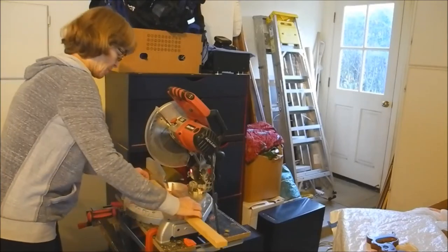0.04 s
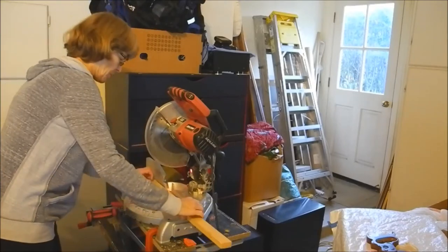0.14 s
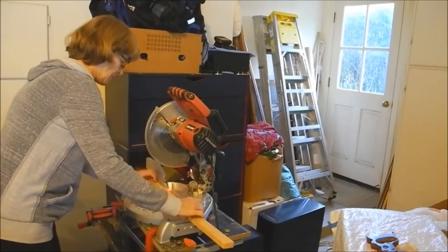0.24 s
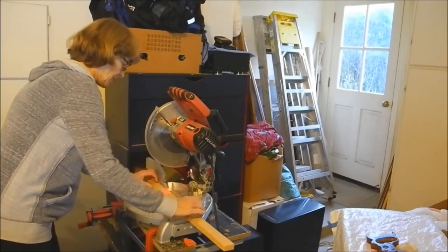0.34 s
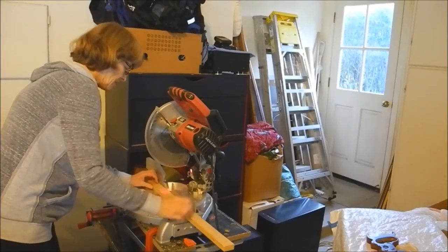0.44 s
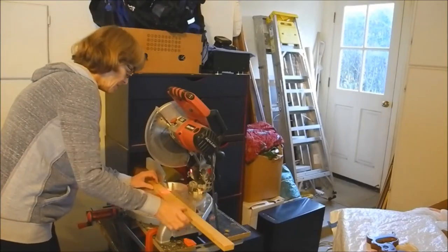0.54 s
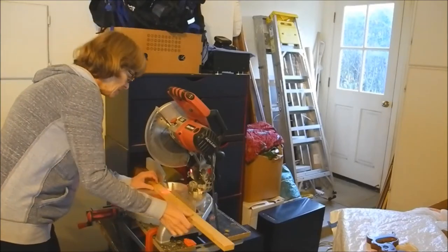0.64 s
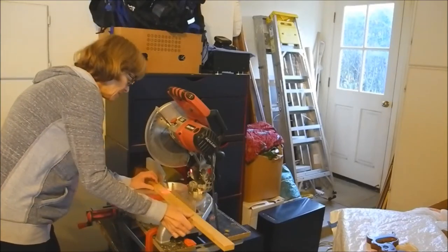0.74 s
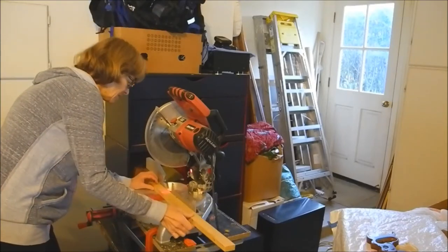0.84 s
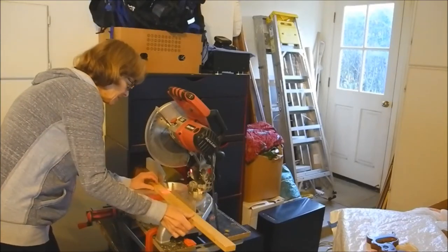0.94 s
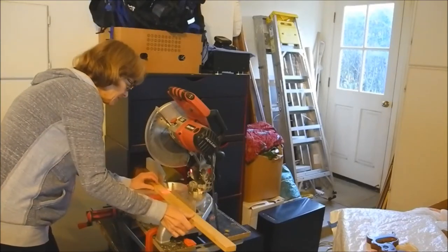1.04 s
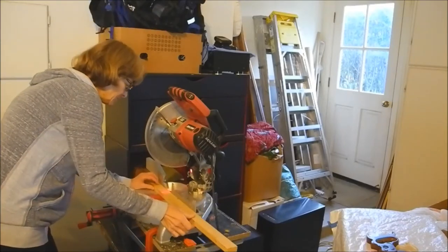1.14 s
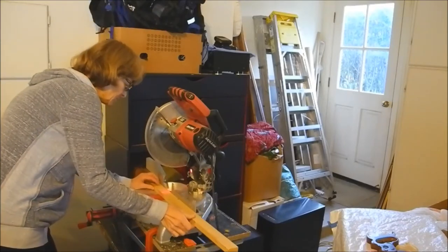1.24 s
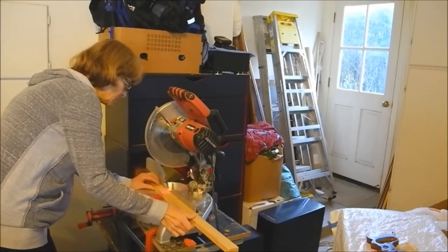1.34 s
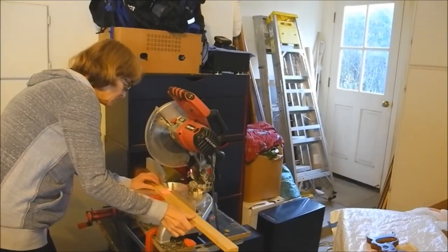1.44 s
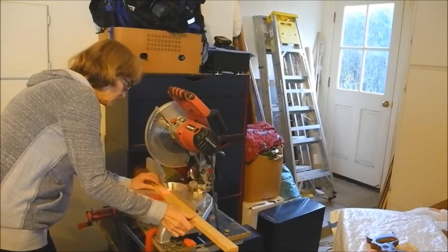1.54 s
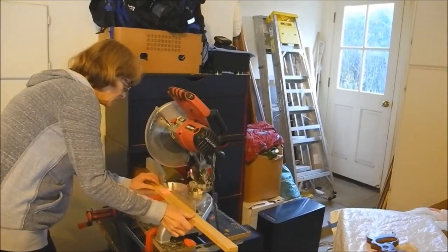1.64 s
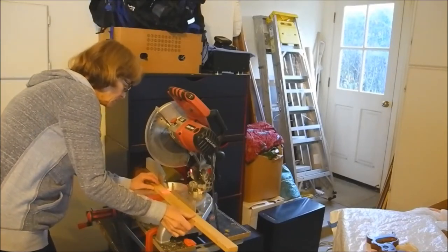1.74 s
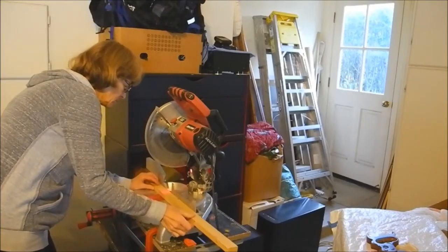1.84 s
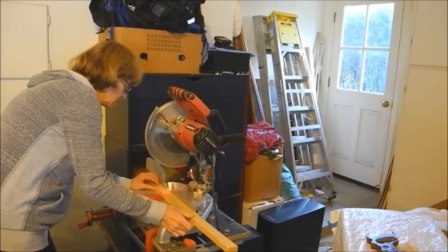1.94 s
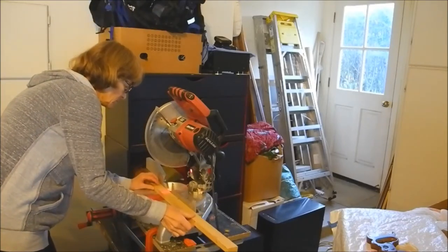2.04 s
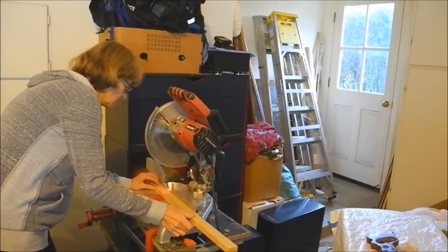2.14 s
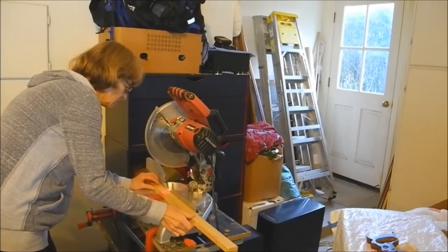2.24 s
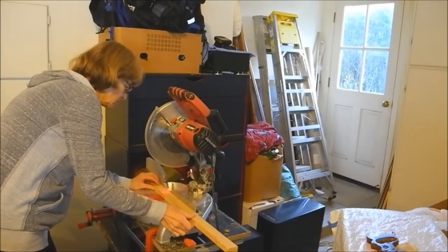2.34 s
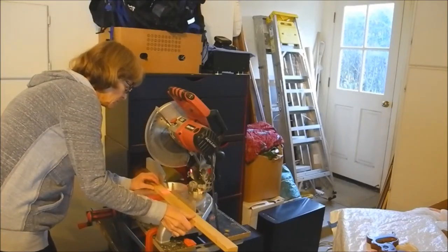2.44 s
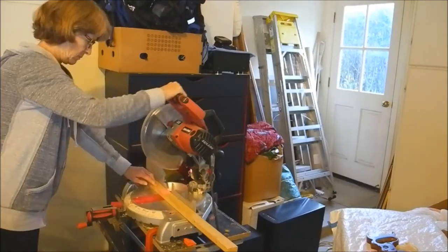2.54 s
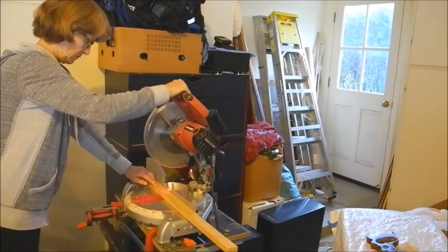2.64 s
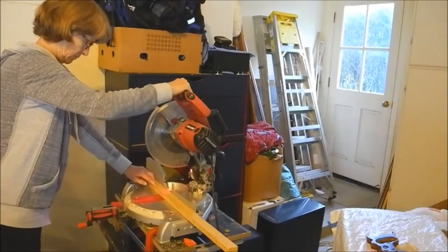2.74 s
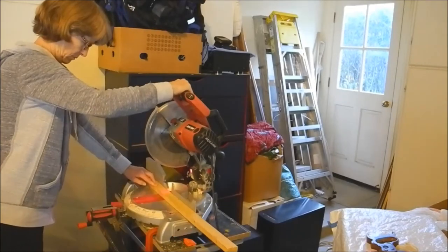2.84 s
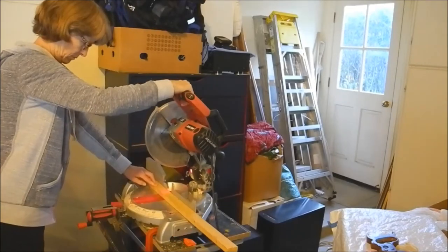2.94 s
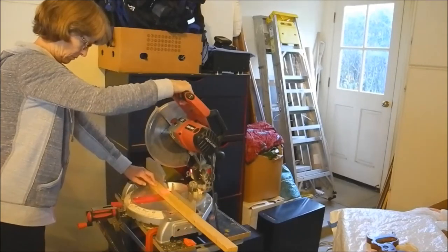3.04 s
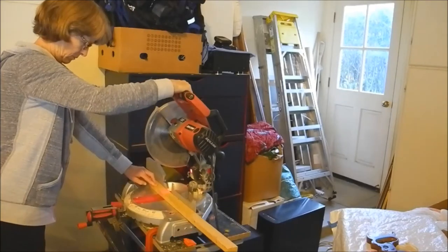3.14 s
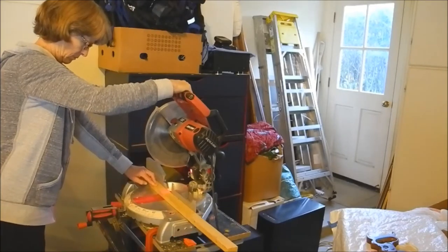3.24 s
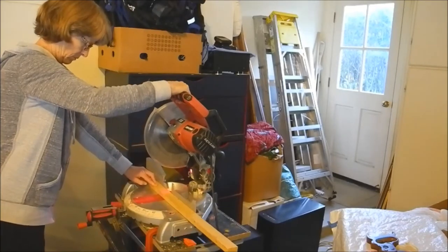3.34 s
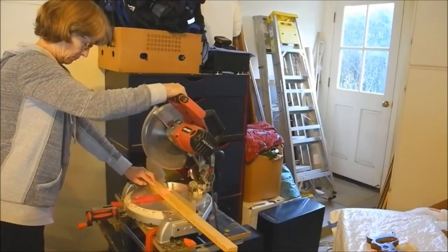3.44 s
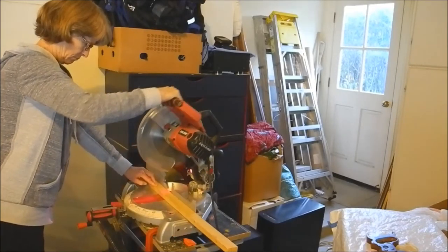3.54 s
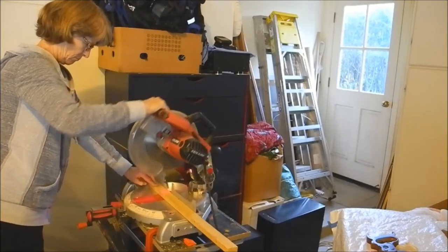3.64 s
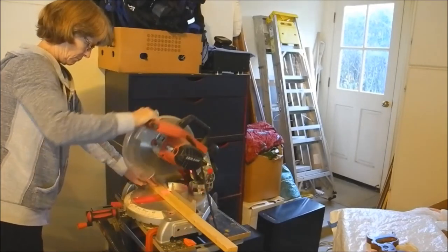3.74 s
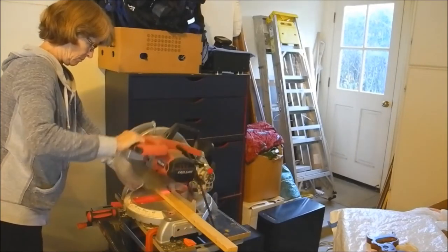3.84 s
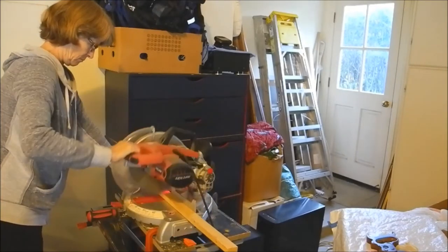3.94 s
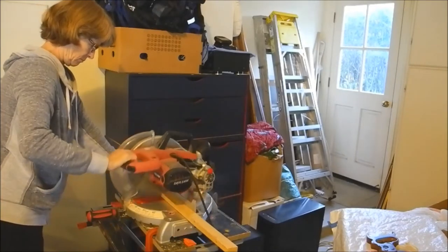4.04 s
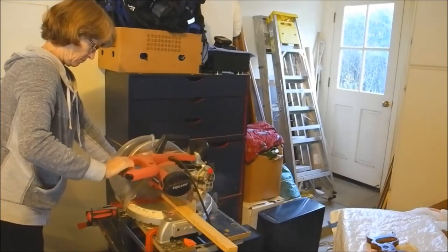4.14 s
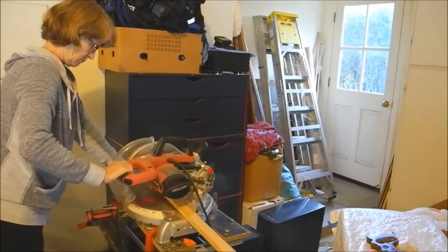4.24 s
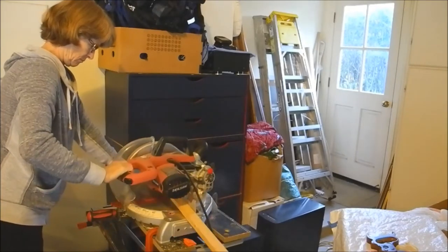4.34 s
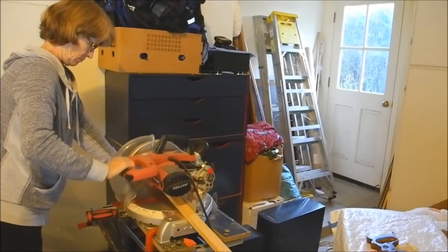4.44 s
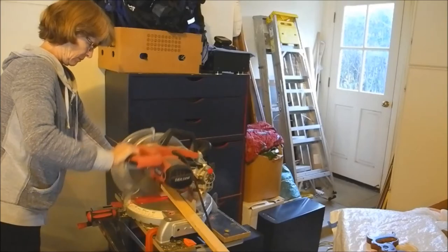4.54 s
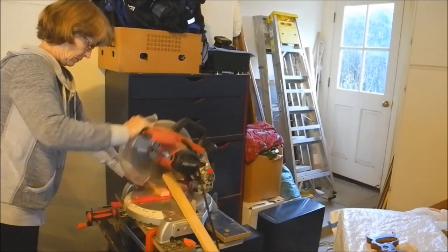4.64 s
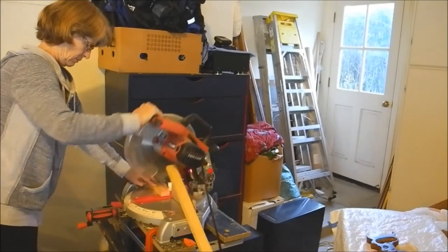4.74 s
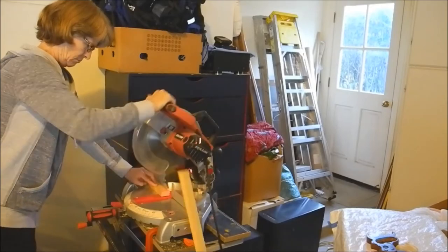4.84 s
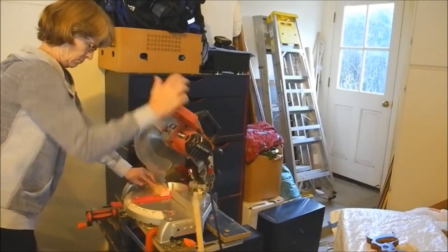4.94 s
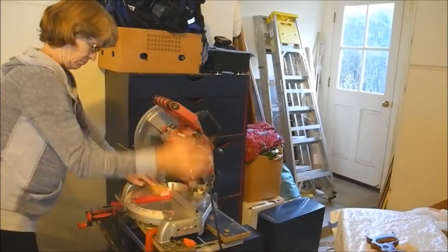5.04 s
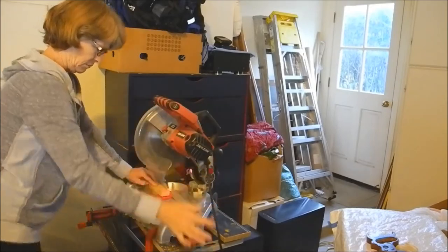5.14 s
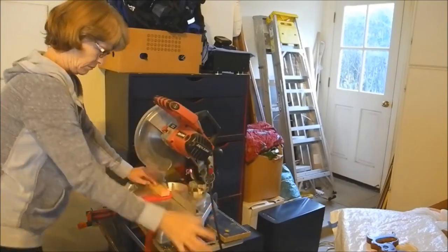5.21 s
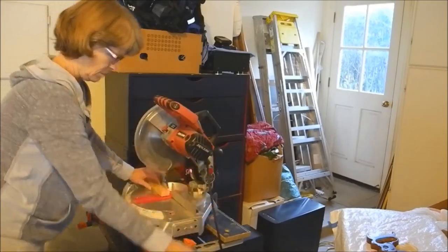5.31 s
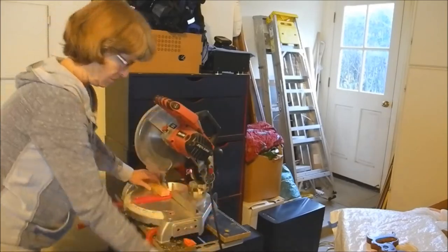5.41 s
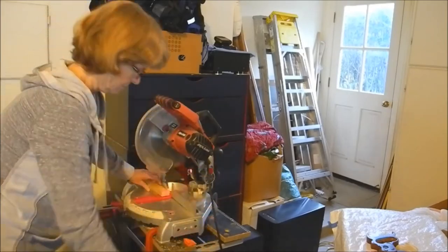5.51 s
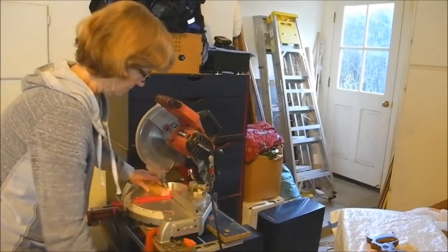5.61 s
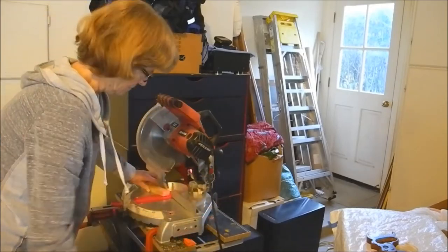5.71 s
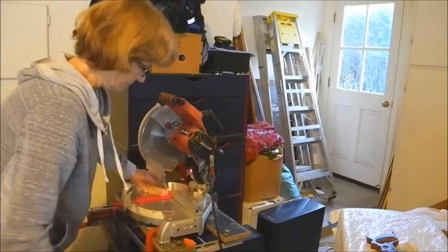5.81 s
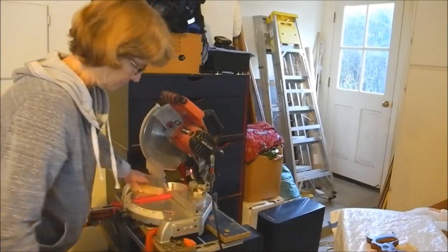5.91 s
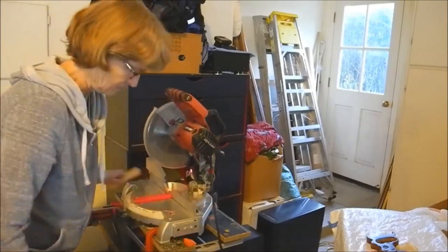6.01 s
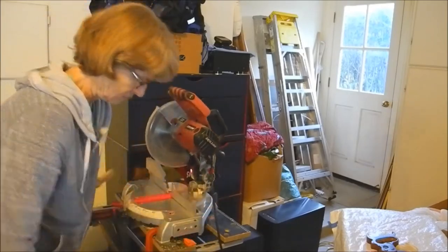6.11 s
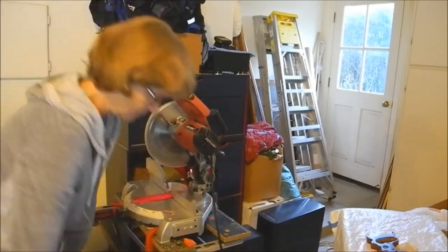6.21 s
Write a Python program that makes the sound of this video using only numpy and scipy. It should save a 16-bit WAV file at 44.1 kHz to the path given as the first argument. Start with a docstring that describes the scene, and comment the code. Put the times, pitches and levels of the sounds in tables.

```python
"""In a garage, a wood strip is knocked and slid into place on a miter saw and a hand claps onto the handle.
The motor kicks in, winds up, sags in the cut, then brakes and coasts with falling whines. The sawn-off
length bounces on the floor; the short piece knocks on the saw's table. The saw is noise and tones tied to
its shaft speed; knocks are noise bursts with ringing modes; slides and the room are coloured noise."""
import sys
import numpy as np
from scipy import signal
from scipy.fft import rfft, irfft, next_fast_len
from scipy.io import wavfile
from scipy.ndimage import map_coordinates

SR = 44100
rng = np.random.default_rng(int(sys.argv[2]) if len(sys.argv) > 2 else 0)


def to_wav(sig):
    """Store sig (one row per channel, or 1-D mono) as 16-bit WAV at the path in sys.argv[1].

    Samples outside -1..1 are clipped; the rate is SR.
    """
    pcm = np.clip(np.atleast_2d(sig), -1, 1) * 32767
    pcm = np.round(pcm).astype(np.int16)
    wavfile.write(sys.argv[1], SR, pcm.T)  # frames by channels


N = 276507
T = np.arange(N) / SR  # seconds

# Whistles of the blade teeth. Each row: multiple of the tooth rate, relative level in dB.
TOOTH_WHISTLES = [(2, 1), (3, -13), (4, 0), (5, -12), (6, -1.5), (8, -5), (10, -8), (12, -6)]
# How well the blade radiates. Each row: frequency in Hz, gain in dB driven, gain in dB coasting.
BLADE_RADIATION = [(300, -30, -30), (1000, -14, -11), (1700, -5, -3), (2700, 1, 2), (3500, -2, 0),
                   (4500, -5, -7), (5300, -6, -13), (6000, 1, -12), (7000, 1.5, -8), (9000, -8, -22),
                   (10500, -9, -25), (13000, -1, -30), (15500, -4, -40)]
# The blade singing in the kerf. Each row: frequency in Hz, relative level in dB.
KERF_SONG = [(2423, 12), (6290, 1), (12900, -10)]
# Colour of the driven saw. Each row: frequency in Hz, relative density in dB per Hz.
RUNNING_COLOUR = [(88, -55), (150, -41.5), (290, -13.5), (333, -9), (381, -9.5), (491, 3), (530, -2.5),
                  (683, 1.5), (932, 0), (1770, -2), (2710, 5), (8880, -18), (11700, -17.5), (13100, -19),
                  (15600, -21.5)]
# Swish of the free blade. Each row: frequency in Hz, relative density in dB per Hz.
COASTING_COLOUR = [(120, -77), (200, -45), (310, -18), (489, -4.5), (1090, -4), (1690, -3), (1880, -6.5),
                   (2710, -2), (4770, -10), (6620, -8.5), (8550, -21), (10300, -14), (15600, -27.5)]
# Resonances of the motor housing. Each row: frequency in Hz, width in Hz, relative level in dB.
HOUSING_PEAKS = [(487, 26, 4.5), (570, 52, -4), (676, 12, 0), (730.3, 28, 9), (749.4, 34, 4),
                 (900, 23, -19.5), (988, 25, -0.5), (1175, 33, -5), (1294, 79, 2.5), (1683, 53, -1),
                 (2222, 40, -17), (2435, 50, -4.5), (2700, 210, -11), (3390, 61, 2.5)]
# Gear case under starting torque. Each row: frequency in Hz, width in Hz, relative level in dB.
GEAR_CASE_PEAKS = [(244, 23, -9), (478, 23, -1.5), (719, 22, 0), (914, 44, 2.5), (978, 22, 3),
                   (1183, 90, -6), (1474, 15, -2.5)]
# Swells of the roar while the head is lowered and lifted. Each row: time in seconds, level in dB.
ROAR_SWELLS = [(3.55, -24), (3.738, -23.5), (3.94, -21), (4.022, -26.5), (4.244, -24.5), (4.272, -27),
               (4.422, -21), (4.446, -24), (5.0, -23)]

# Wood set on the saw's table.
# Each row: start in seconds, relative level in dB, thud trim in dB, click trim in dB.
PLACING_BLOWS = [(0.002, -15, -17, -10), (0.046, -18, -24, -15), (0.093, -20, -52, -19),
                 (0.303, -13.5, -13, -21), (0.309, -11.5, -14.5, -23), (0.335, -23, -18, -42),
                 (0.526, -32.5, -11, -44), (0.641, -33, -35, -14)]
# Blows on the saw's handle and switch.
# Each row: start in seconds, relative level in dB, thud trim in dB, click trim in dB.
HANDLE_BLOWS = [(2.6395, -8, -18, -13.5), (2.979, -42.5, -29, -3), (3.005, -35, -28, -12.5),
                (3.136, -18, -30, -0.5)]
# The sawn-off length on the floor.
# Each row: start in seconds, relative level in dB, thud trim in dB, click trim in dB.
FLOOR_BLOWS = [(5.162, -22.5, 5, 9), (5.391, -30.5, 3.5, -35), (5.434, -27.5, -12, 5),
               (5.45, -26.5, -6, -33), (5.485, -37, -6, -28), (5.53, -28.5, -12, -21),
               (5.635, -30.5, -23, 11), (5.66, -32, -11, 18), (5.715, -38, -16, -7)]
# The short piece on the table.
# Each row: start in seconds, relative level in dB, thud trim in dB, click trim in dB.
OFFCUT_BLOWS = [(6.073, -14, -4.5, 0)]
# Ring of the saw's table. Each row: frequency in Hz, mean level in dB, t60 in seconds.
TABLE_RING = [(737, -12, 0.25), (1057, 5.5, 0.35), (1236, -11, 0.07), (1430, -18, .3), (2020, -28, .3),
              (2480, -18, 0.35)]
# Ring of the saw's head and guard. Each row: frequency in Hz, mean level in dB, t60 in seconds.
SAW_RING = [(479, 0, .36), (641, -2, .26), (700, -7, .36), (834, -14, .4), (1190, -2, .25), (1260, -11, .3),
            (2250, -24, .25), (2401, -21, .25), (2988, -27, .6), (3321, -19, .24), (7138, -40, .45)]
# Ring of the wood strip. Each row: frequency in Hz, mean level in dB, t60 in seconds.
STRIP_RING = [(500, -12, 0.2), (650, -5.5, 0.31), (925, 1, 0.3), (1330, -28, 0.18), (1672, 4, 0.14),
              (1750, -6, 0.13), (2510, -15, 0.13), (2850, -15, 0.11)]
# Rattle of knocked wood. Each row: frequency in Hz, relative density in dB per Hz.
WOOD_RATTLE = [(59, -65), (100, -32), (383, -4.5), (425, -14.5), (558, -6.5), (674, -2.5), (718, -12),
               (780, -14), (1320, -9), (2130, -18), (5720, -55), (15000, -75)]
# Rattle of the knocked saw. Each row: frequency in Hz, relative density in dB per Hz.
SAW_RATTLE = [(59, -66), (100, -38), (246, -17), (345, -38.5), (492, 4.5), (570, -24), (718, -5),
              (1090, -7.5), (1210, -1.5), (1490, -16), (3050, -19), (7350, -36), (9260, -40.5),
              (13000, -39), (15000, -47)]
# Hollower rattle of the short piece. Each row: frequency in Hz, relative density in dB per Hz.
HOLLOW_RATTLE = [(100, -30), (250, -14.5), (450, -0.5), (700, -3.5), (1000, 1.5), (1300, 3.5), (1700, -15),
                 (4000, -20), (12000, -50)]
# Steel left ringing by a knock, the fence, then the still blade.
# Each row: start in seconds, frequency in Hz, starting level in dB, t60 in seconds.
STEEL_TONES = [(0.003, 2410, -42, .6), (0.003, 3270, -49, .55), (0.093, 1960, -23, .07),
               (0.093, 1945, -34, .35), (2.641, 3820, -56, 4.5)]
# The strip pushed along the fence.
# Each row: centre in seconds, half length in seconds, level in dB, treble tilt in dB.
STRIP_PUSHES = [(0.176, .02, -59, -7), (0.452, 0.017, -51, 10), (0.666, 0.23, -63.5, 15.5),
                (0.873, 0.042, -50, 1), (1.097, 0.044, -50.5, 0.5), (1.278, 0.032, -50.5, 2.5)]
# Rub of the strip. Each row: frequency in Hz, relative density in dB per Hz.
RUB_COLOUR = [(240, -32), (400, -5), (510, -14), (650, 2.5), (867, -17), (979, -3), (1290, -4.5),
              (2220, -12.5), (15000, -43)]

# Murmur of the garage. Each row: frequency in Hz, relative density in dB per Hz.
MURMUR_COLOUR = [(12, -41), (20, -16), (70, -5), (126, -3), (282, -10), (343, -7.5), (453, -14),
                 (521, -8.5), (616, -13), (814, -13), (1050, -18), (2100, -26), (3560, -29.5),
                 (15600, -36.5)]
# Stereo width of noise. Each row: frequency in Hz, left-right likeness from 0 to 1.
LIKENESS = [(30, .05), (100, 0.41), (300, 0.59), (600, 0.81), (1200, 0.52), (2500, 0.35), (5000, 0.3),
            (10000, .05)]
# Stereo lean. Each row: frequency in Hz, left minus right in dB.
STEREO_LEAN = [(100, -2), (500, -0.5), (1000, -1), (3000, -3), (8000, -1.5), (12000, -5.5)]
# Decay of the garage's echo. Each row: frequency in Hz, t60 in seconds.
GARAGE_T60 = [(150, 0.5), (400, 0.49), (1000, .42), (3000, 0.41), (8000, 0.37), (15000, 0.26)]

ON_S, OFF_S, STOP_S = 3.13, 4.879, 5.163  # switch closes; switch opens and brake grips; brake lets go
FREE_HZ = 343.8  # turns per second that the unloaded motor tends to
KICK_SHARE, KICK_S, WIND_UP_S = .229, .1, .485  # first kick's share of that speed; two time constants
CUT_S, SAG_HZ, SAG_S = 3.986, 13.95, .173  # blade meets wood; speed lost; time to the deepest sag
SLOW_S, SLOW_POWER = 3.03, 6.027  # switched off, speed falls as (1 + t / SLOW_S) ** -SLOW_POWER
CUT_LENGTH_S, CUT_ATTACK_S, CUT_RELEASE_S = 0.22, 0.016, 0.054  # in the wood; entering; breaking through
BITE_DB, BITE_DB_PER_S = -37, 31  # cutting gain on entering; its growth as the blade sinks in
SHAKE_HZ, SHAKE_WIDTH_HZ = 203, 28  # shaft speed at which the saw resonates, and how widely
COAST_DB, COAST_DB_PER_S = -42, 2.5  # gain of the free blade and gears, and its slow swell
WHINE_FADE_DB_PER_S, FREE_WHISTLE_DB = 60, -42.7  # whine's fade once switched off; coasting whistle gain
BARS, TEETH_PER_TURN = 40, 8.2  # commutator pulses and blade teeth for each turn of the motor
MURMUR_DB = -57  # murmur heard up to the saw's start
TOP_HZ = 15780  # band limit


def amp(db):
    """Decibels to gain."""
    return 10 ** (np.asarray(db) / 20)


def unit(x):
    """Scale to rms 1."""
    return x / np.sqrt(np.mean(x ** 2) + 1e-20)


def along(points, hz):
    """(Hz, value) points read on a log axis."""
    f, v = np.transpose(points)
    return np.interp(np.log(hz + 1), np.log(f + 1), v)


def wobble(rate):
    """A smooth random curve, rate knots a second."""
    return map_coordinates(rng.standard_normal(int(N * rate / SR) + 4), [T * rate])


def after(s, rise):
    """A gate that opens at s over rise seconds."""
    return np.clip((T - s) / rise, 0, 1)


def bump(s, half):
    """A bell-shaped swell centred on s."""
    return np.exp(-.5 * ((T - s) / half) ** 2)


def filtered(x, response):
    """x times a response of frequency."""
    n = x.shape[-1]
    m = next_fast_len(n + 8192)
    return irfft(rfft(x, m) * response(np.fft.rfftfreq(m, 1 / SR)), m)[..., :n]


def below(hz, edge_hz, order=6):
    """Low side of a crossover."""
    return 1 / (1 + (hz / edge_hz) ** order)


def resonances(peaks, hz):
    """Response of a body with (Hz, width, dB) peaks of alternating sign."""
    def peak(centre, width, db):
        return amp(db) * 1j * hz * width / (centre ** 2 - hz ** 2 + 1j * hz * width)
    return sum((-1) ** k * peak(*row) for k, row in enumerate(peaks))


def diffuse(response, size=N):
    """Coloured stereo noise of rms 1, its channels most alike in the midrange."""
    def mid_and_side(hz):
        turn = np.arccos(np.clip(along(LIKENESS, hz), -1, 1)) / 2
        return response(hz) * np.array([np.cos(turn), np.sin(turn)])
    mid, side = filtered(rng.standard_normal((2, size)), mid_and_side)
    return unit(np.array([mid + side, mid - side]))


def in_garage(x, wet_db):
    """Direct sound plus a tail whose treble dies first, at about the same power."""
    hz, t, z = signal.stft(diffuse(np.ones_like, size=SR // 2), SR, nperseg=256)
    decay = amp(-60 * t / along(GARAGE_T60, hz)[:, None]) * np.clip(t / 0.0029, 0, 1)
    tail = signal.istft(z * decay, SR, nperseg=256)[1]
    echo = signal.fftconvolve(x[None], tail / np.linalg.norm(tail[0]), axes=1)[:, :len(x)]
    return (x + amp(wet_db) * echo) / np.hypot(1, amp(wet_db))


def shaft_speed():
    """Turns per second: a kick and a wind-up, a sag in the cut, and a long run-down."""
    run = np.clip(T, ON_S, OFF_S) - ON_S
    wind_up = 1 - KICK_SHARE * np.exp(-run / KICK_S) - (1 - KICK_SHARE) * np.exp(-run / WIND_UP_S)
    load = (np.clip(T, CUT_S, OFF_S) - CUT_S) / SAG_S
    driven = FREE_HZ * wind_up - SAG_HZ * load * np.exp(1 - load)
    return driven / (1 + np.maximum(T - OFF_S, 0) / SLOW_S) ** SLOW_POWER


def in_wood():
    """1 while the blade is in the wood, 0 outside."""
    return after(CUT_S, CUT_ATTACK_S) * (1 - after(CUT_S + CUT_LENGTH_S, CUT_RELEASE_S))


def loudness(speed, full_db, doubling_db, shake_db, cut_db, sway):
    """A running part's level in dB, following speed, the shaking resonance, the cut and the roar."""
    doublings = np.log2(np.maximum(speed / FREE_HZ, 1 / 10))
    shaking = np.exp(-.5 * ((speed - SHAKE_HZ) / SHAKE_WIDTH_HZ) ** 2)
    roar_s, roar_db = np.transpose(ROAR_SWELLS)
    swell_db = np.interp(T, roar_s, roar_db) - np.mean(roar_db)
    return full_db + doubling_db * doublings + shake_db * shaking + cut_db * in_wood() + sway * swell_db


def fan_level(speed):
    """The fan's reference level in dB, shared by its rush and its buzz."""
    return loudness(speed, full_db=-23.0, doubling_db=5.5, shake_db=2.5, cut_db=0.2, sway=1.14)


def motor(speed, turns, powered):
    """Gear noise in the housing and fan rush pulse with the shaft; brush hiss pulses at 120 Hz."""
    gears_db = loudness(speed, full_db=-28.5, doubling_db=-0.7, shake_db=2.5, cut_db=-1.5, sway=0.99)
    hiss_db = loudness(speed, full_db=-28, doubling_db=4.5, shake_db=6.0, cut_db=4.5, sway=0.91)
    draught_db = loudness(speed, full_db=-54.5, doubling_db=1.5, shake_db=4.0, cut_db=6.0, sway=2.0)
    colour = lambda hz: amp(along(RUNNING_COLOUR, hz))

    low_rush = diffuse(lambda hz: colour(hz) * np.sqrt(below(hz, 1910)))
    housing = diffuse(lambda hz: resonances(HOUSING_PEAKS, hz))
    gears = amp(gears_db + wobble(70)) * (low_rush + amp(-5.0) * housing)

    fan_rush = diffuse(lambda hz: colour(hz) * np.sqrt(below(hz, 5000) * (1 - below(hz, 1220))))
    fan = amp(fan_level(speed) - 1.35 + 1.64 * wobble(90)) * fan_rush

    sparks = unit(amp(1.9 * wobble(1500)) * (1 + 0.034 * np.sin(2 * np.pi * 120 * T)))
    hiss = amp(hiss_db) * sparks * diffuse(lambda hz: colour(hz) * np.sqrt(1 - below(hz, 5960)))
    draught = amp(draught_db + 1.7 * wobble(9)) * diffuse(lambda hz: below(hz, 390))

    # the rotor's unbalance grows with speed
    unbalance = amp(-38.0) * (speed / speed.max()) ** 20 * np.sin(2 * np.pi * turns)
    shaft_pulse = 1 + 0.052 * np.sin(2 * np.pi * turns)
    return powered * ((gears + fan) * shaft_pulse + hiss + draught + unbalance)


def shaft_buzz(speed, turns, powered, buzz_db=-8, flutter_db=4):
    """Fan vanes and bearings buzz on multiples 2 to 21 of the shaft rate, each one fluttering."""
    def order(k):
        level_db = along(RUNNING_COLOUR, k * speed) + flutter_db * wobble(22)
        return amp(level_db) * np.sin(2 * np.pi * k * turns + 0.45 * wobble(70))
    buzz = unit(powered * sum(order(k) for k in range(2, 22))) * np.sqrt(np.mean(powered ** 2))
    return in_garage(amp(fan_level(speed) + buzz_db) * buzz, wet_db=-0.5)


def inrush(speed, powered, hum_hz=120, hum_db=-38.0, hum_power=1.25, growl_db=-16.5, growl_power=2.2):
    """Motor current hums and rattles the gear case in surges; it falls as speed nears the free speed."""
    current = np.abs(1 - speed / FREE_HZ) * (T < OFF_S)
    phase = 2 * np.pi * hum_hz * T
    surges = rng.standard_normal(N) * np.exp(np.cos(phase))
    case = unit(in_garage(filtered(surges, lambda hz: resonances(GEAR_CASE_PEAKS, hz)), wet_db=-8))
    hum = np.sin(phase) + 0.46 * np.sin(2 * phase)
    hum_gain = amp(hum_db) * current ** hum_power
    growl_gain = amp(growl_db) * current ** growl_power
    return powered * (hum_gain * hum + growl_gain * case)


def commutator_whine(speed, turns):
    """Commutator pulses whine thinly with the shaft, fading once switched off; boosted on the left."""
    whine_db = loudness(speed, full_db=-29.3, doubling_db=10, shake_db=-3, cut_db=-10, sway=.7)
    whine_db = whine_db - WHINE_FADE_DB_PER_S * np.maximum(T - OFF_S, 0)
    tone = np.sin(2 * np.pi * BARS * turns + .5 * wobble(300))
    whine = amp(whine_db + 3.2 * wobble(25.0)) * tone
    return in_garage(whine * after(ON_S, 0.13), wet_db=11) * amp([[2.5], [-5]])


def tooth_whistles(speed, teeth, powered):
    """Multiples of the tooth rate follow the shaft through the blade's radiation, swelling under braking."""
    braking = after(OFF_S, .07) * (1 - after(STOP_S - .1, .1))
    driven_db = loudness(speed, full_db=-42, doubling_db=-3.5, shake_db=0, cut_db=-3, sway=1) + 6 * braking
    teeth_db = powered * driven_db + (1 - powered) * FREE_WHISTLE_DB
    tooth_hz = TEETH_PER_TURN * speed
    blade = np.array(BLADE_RADIATION)

    def whistle(k, db):
        hz = k * tooth_hz
        radiated_db = powered * along(blade[:, [0, 1]], hz) + (1 - powered) * along(blade[:, [0, 2]], hz)
        # the highest multiples stand out only once the blade runs free
        muted_db = -2 * max(k - 6, 0) * powered
        gain = amp(db + muted_db + radiated_db + 3 * wobble(20))
        return gain * np.sin(2 * np.pi * k * teeth + .5 * wobble(150))

    stack = sum(whistle(k, db) for k, db in TOOTH_WHISTLES)
    return in_garage(amp(teeth_db) * stack * after(ON_S, .15), wet_db=-3)


def cut(teeth):
    """Teeth tear chips from the wood, harder as the blade sinks in, while it sings in the kerf."""
    chip_colour = [(1500, -12), (4000, -2), (6500, 4), (9000, -19), (15000, 1)]  # Hz, dB
    chips = diffuse(lambda hz: amp(along(chip_colour, hz)))
    tooth_pulse = 1 + .5 * np.sin(2 * np.pi * teeth)
    song = sum(amp(db + 2.7 * wobble(10)) * np.sin(2 * np.pi * hz * T + wobble(60)) for hz, db in KERF_SONG)
    bite = in_wood() * amp(BITE_DB + BITE_DB_PER_S * np.clip(T - CUT_S, 0, CUT_LENGTH_S))
    return bite * (amp(-1) * chips * tooth_pulse + amp(-8.5) * in_garage(song, wet_db=28))


def brake_groan(turns, s=5.085, half=0.023, db=-31):
    """The slowing rotor's second order swells briefly near the housing's lowest resonance."""
    groan = np.sin(4 * np.pi * turns + 0.5 * wobble(120))
    return in_garage(amp(db) * bump(s, half) * groan, wet_db=-15)


def coasting():
    """The free blade swishes and its gears whirr in the housing."""
    swish = diffuse(lambda hz: amp(along(COASTING_COLOUR, hz)))
    whirr = diffuse(lambda hz: resonances(HOUSING_PEAKS, hz))
    level_db = COAST_DB + COAST_DB_PER_S * (T - STOP_S)
    gain = after(STOP_S - .02, 0.013) * amp(level_db + 0.89 * wobble(60))
    return gain * (amp(2.5) * swish + amp(-4) * whirr)


def blows(rows, modes, colour, gain_db, ring_db, rattle_t60, wet_db, thud_db, click_db):
    """Each contact is a brief noisy rattle of dense modes, plus the object's few separate ones."""
    out = np.zeros((2, N + SR))
    t = np.arange(SR * 3 // 4) / SR
    onset = 1 - np.exp(-t / .0004)
    # a high-pass at 70 Hz keeps the abrupt onset free of low thumps
    high_pass = signal.butter(2, 70, 'highpass', fs=SR, output='sos')

    def mode(hz, level, t60):
        gain = amp(level + rng.normal(0, 1.8) - 60 * t / t60)
        return gain * np.sin(2 * np.pi * (hz * t + rng.random()))

    for s, db, thud, click in rows:
        rattle = unit(filtered(rng.standard_normal(len(t)), lambda hz: amp(along(colour, hz))))
        ring = sum(mode(*row) for row in modes)
        contact = rattle * amp(-60 * t / rattle_t60) + amp(ring_db) * ring
        # a hard contact favours the treble, a heavy one the bass
        hardness = [(60, thud - 14), (350, thud + thud_db), (800, 0), (1600, 0), (4000, click + click_db)]
        hit = filtered(contact, lambda hz: amp(along(hardness, hz)))
        placed = in_garage(signal.sosfilt(high_pass, hit * onset), wet_db)
        out[:, max(round(s * SR), 0):][:, :len(t)] += amp(db + gain_db) * placed
    return out[:, :N]


def handling():
    """Wood on the table, hand on the saw, the strip bouncing on the floor, and the short piece."""
    placing = blows(PLACING_BLOWS, TABLE_RING, WOOD_RATTLE, gain_db=-3.5, ring_db=-23.5,
                    rattle_t60=0.05, wet_db=0.5, thud_db=10.0, click_db=26.5)
    clacks = blows(HANDLE_BLOWS, SAW_RING, SAW_RATTLE, gain_db=3.0, ring_db=-16.5,
                   rattle_t60=0.055, wet_db=0.0, thud_db=6.5, click_db=12.0)
    drops = blows(FLOOR_BLOWS, STRIP_RING, WOOD_RATTLE, gain_db=-1, ring_db=-4,
                  rattle_t60=0.045, wet_db=-3, thud_db=-1, click_db=13)
    offcut = blows(OFFCUT_BLOWS, TABLE_RING, HOLLOW_RATTLE, gain_db=1.5, ring_db=-35,
                   rattle_t60=0.07, wet_db=4.5, thud_db=-1, click_db=-3)
    return placing + clacks + drops + offcut


def steel_rings():
    """Single decaying tones of struck steel."""
    def ping(s, hz, db, t60):
        return after(s, 0.00094) * amp(db - 60 * np.abs(T - s) / t60) * np.sin(2 * np.pi * hz * T)
    return sum(ping(*row) for row in STEEL_TONES)


def slides(grain_db=1.0):
    """Pushes of the strip along the fence: swells of noise, grainy with friction."""
    out = np.zeros((2, N))
    for s, half, db, treble_db in STRIP_PUSHES:
        rub = diffuse(lambda hz: amp(along(RUB_COLOUR, hz) + treble_db * (1 - below(hz, 2400))))
        out += amp(db) * bump(s, half) * rub
    return out * amp(grain_db * wobble(170))


def garage_murmur():
    """Low coloured noise of the garage, heard 8.5 dB quieter from the saw's start onward."""
    return amp(MURMUR_DB - 8.5 * after(ON_S, .05)) * diffuse(lambda hz: amp(along(MURMUR_COLOUR, hz)))


def scene(ease_s=0.09, ease_db=-7):
    """Saw, knocks and slides pass through a slight lean to the right, over the quiet of the garage."""
    speed = shaft_speed()
    turns = np.cumsum(speed) / SR
    teeth = TEETH_PER_TURN * turns
    # the brake eases off, and once it lets go the roar dies away in the room
    fade_db = ease_db * after(STOP_S - ease_s, ease_s) - 60 * np.maximum(T - STOP_S, 0) / 0.1
    powered = after(ON_S, 0.031) * amp(fade_db)
    saw = motor(speed, turns, powered) + shaft_buzz(speed, turns, powered) + inrush(speed, powered)
    saw = saw + commutator_whine(speed, turns) + tooth_whistles(speed, teeth, powered)
    saw = saw + cut(teeth) + brake_groan(turns) + coasting()
    near = saw + handling() + steel_rings() + slides()
    leaning = filtered(near, lambda hz: amp(np.outer([.5, -.5], along(STEREO_LEAN, hz))))
    return leaning + garage_murmur()


def record(dry):
    """A steep low-pass keeps almost nothing above the band limit."""
    return filtered(dry, lambda hz: below(hz, TOP_HZ, order=240))


dry = scene()
out = record(dry)
to_wav(out)
```